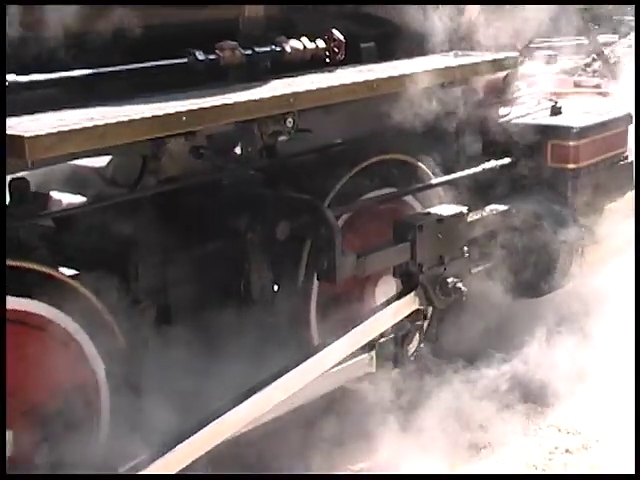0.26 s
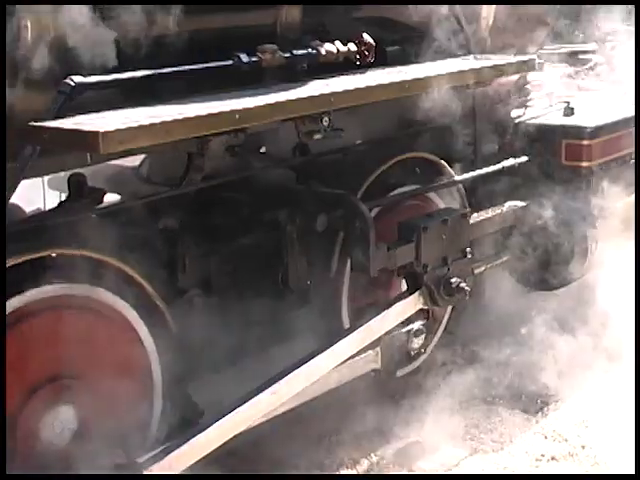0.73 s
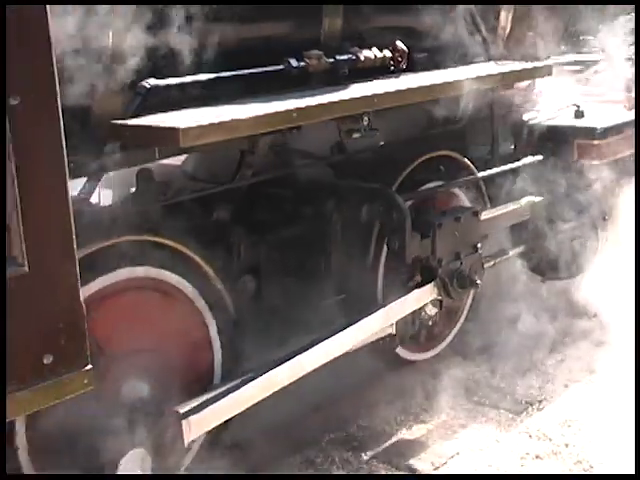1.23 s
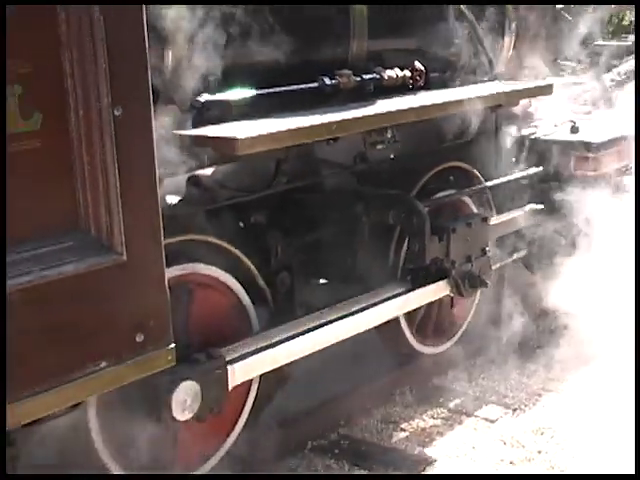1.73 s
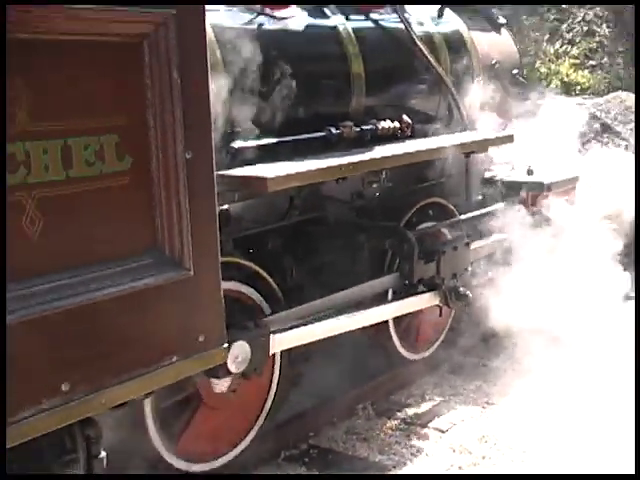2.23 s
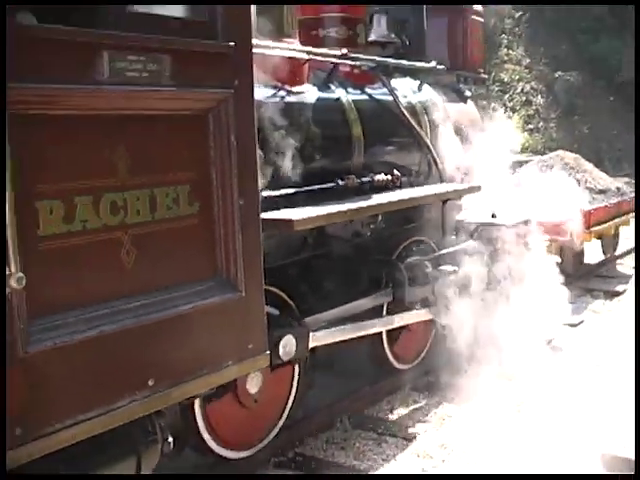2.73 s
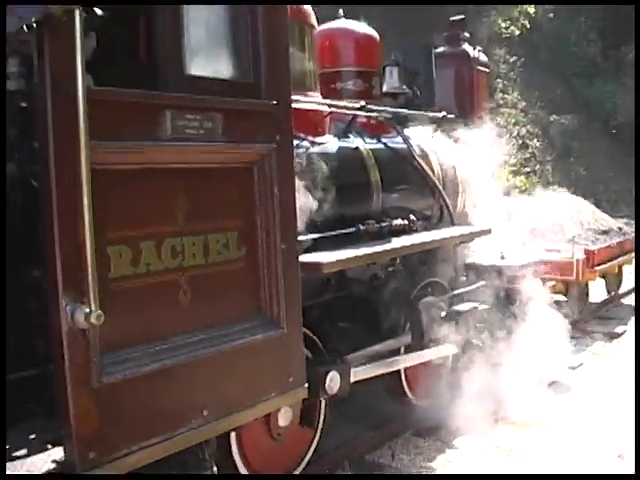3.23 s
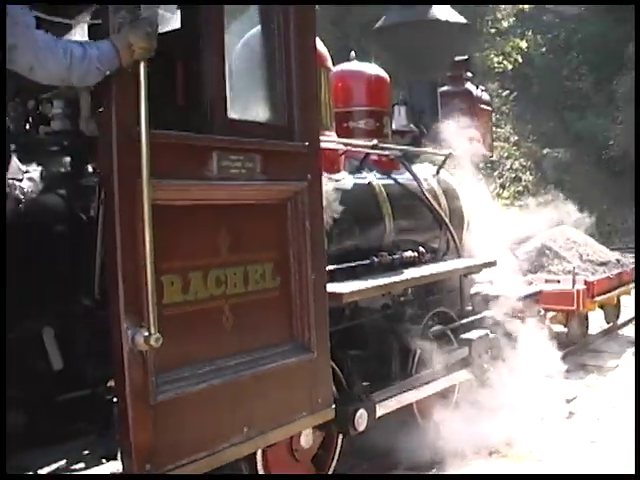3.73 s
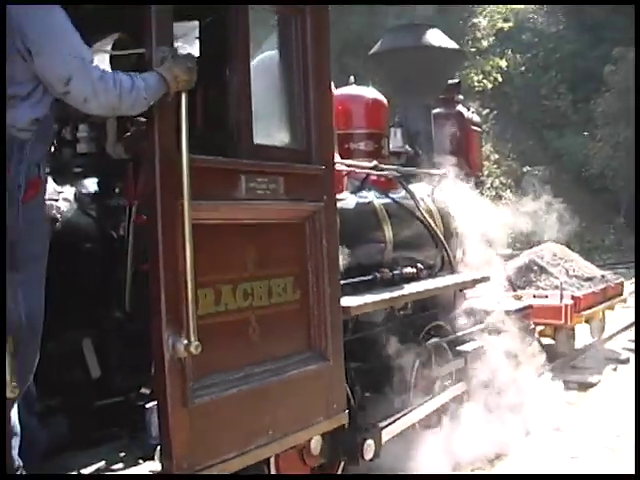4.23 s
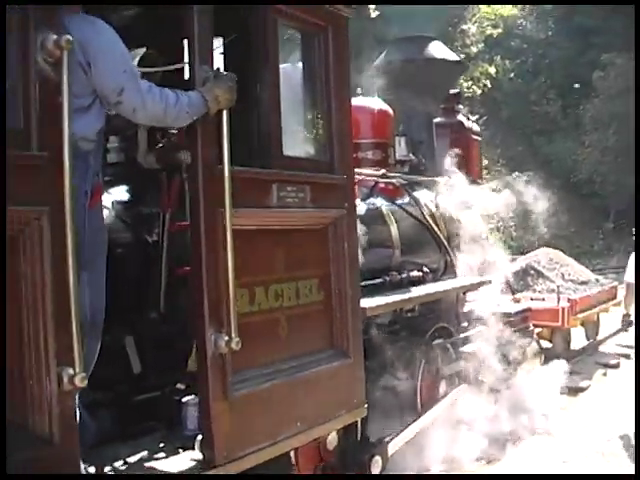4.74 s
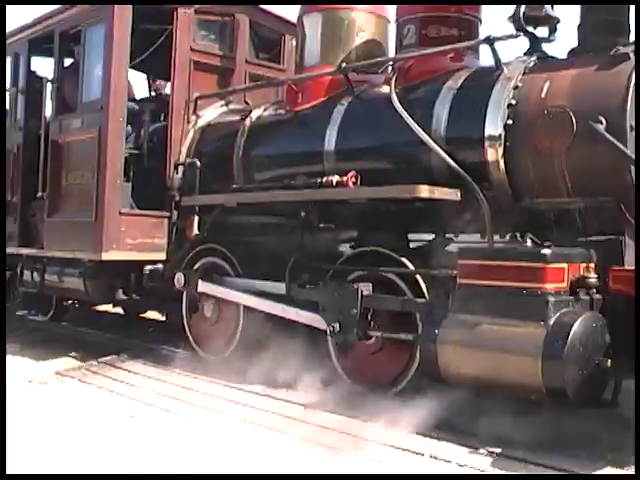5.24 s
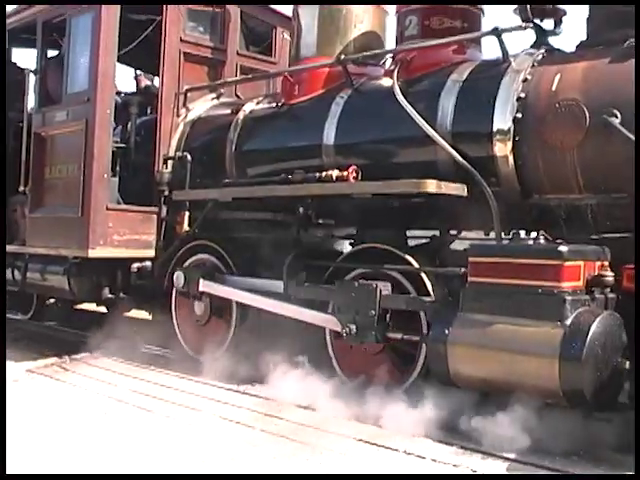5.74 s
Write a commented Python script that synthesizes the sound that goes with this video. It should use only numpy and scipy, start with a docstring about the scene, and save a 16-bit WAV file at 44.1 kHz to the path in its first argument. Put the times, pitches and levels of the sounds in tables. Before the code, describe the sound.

A small steam locomotive hisses loudly up close, chuffing in a limping beat over a low fire rumble, then suddenly sounds softer and farther away.

```python
"""Small steam locomotive, close by the cab, then farther off

A small steam locomotive rolls along, heard from beside its cab. Steam, made of coloured noise, hisses from the
open cylinder cocks and surges at every piston stroke. The chimney answers with chuffs in a limping long-short
beat: bursts of noise through its resonances. The fire rumbles below, with a hollow note that once swells to a tone.
Near the end the sound cuts to a place farther off, where a soft hiss lies between two faint chuffs.
"""
import sys
import numpy as np
from scipy import signal
from scipy.fft import rfft, irfft, next_fast_len
from scipy.io import wavfile
from scipy.ndimage import uniform_filter1d, map_coordinates

SR = 44100
rng = np.random.default_rng(int(sys.argv[2]) if len(sys.argv) > 2 else 0)


def wav_record(signal):
    """Record a signal, one row per channel, as 16-bit PCM in the file named by sys.argv[1]."""
    frames = np.transpose(np.atleast_2d(signal))
    bounded = np.clip(frames, -1, 1)
    # unit amplitude maps onto the largest positive 16-bit level
    quanta = np.round(bounded * 32767).astype(np.int16)
    wavfile.write(sys.argv[1], SR, quanta)


N = 263702

# piston strokes beside the cab, from the two cylinder ends in turn: start_s, chuff_db, gush_db (from the cocks)
STROKES = [(0.376, -22.5, -30), (0.787, -22.5, -25.5), (1.305, -24, -27.5), (1.725, -23, -31),
           (2.239, -23.5, -24.5), (2.655, -23.5, -28.5), (3.173, -23.5, -22), (3.589, -25.5, -22.5),
           (4.114, -25, -22), (4.529, -24.5, -27), (5.048, -24.5, -31)]
# left-right likeness of the engine's sound: frequency_hz, likeness (0-1)
ENGINE_LIKENESS = [(200, .998), (330, 0.94), (550, 0.51), (750, 0.98), (1200, 0.96), (2400, 1), (6000, 1)]


def amp(db):
    """Decibels to gain."""
    return 10 ** (np.asarray(db) / 20)


def unit(x):
    """Scale to rms 1."""
    return x / np.sqrt(np.mean(x ** 2) + 1e-20)


def clock():
    """The time of every sample, in seconds."""
    return np.arange(N) / SR


def along(points, hz):
    """Read (Hz, value) points on a log frequency axis."""
    point_hz, value = np.transpose(points)
    return np.interp(np.log(hz + 1), np.log(point_hz + 1), value)


def wobble(rate):
    """A smooth random curve through rate knots a second."""
    knots = rng.standard_normal(int(N * rate / SR) + 4)
    return map_coordinates(knots, [clock() * rate])


def swell(centre, width):
    """A bell curve in time (s), 1 at its centre."""
    return np.exp(-((clock() - centre) / width) ** 2)


def filtered(x, response):
    """Multiply the spectrum of x by a response of frequency, padded against wrap-around."""
    m = next_fast_len(N + SR // 2)
    hz = np.fft.rfftfreq(m, 1 / SR)
    return irfft(rfft(x, m) * response(hz), m)[..., :N]


def broad(points):
    """The gain of a broad spectrum, as a function of frequency."""
    return lambda hz: amp(along(points, hz))


def resonant(modes):
    """The gain of steep-sided resonances that add in power."""
    def gain(hz):
        power = 0
        for centre_hz, width_hz, db in modes:
            detuning = (hz * hz - centre_hz * centre_hz) / (2 * width_hz * hz + 1e-9)
            power = power + (amp(db) / (1 + 2 * detuning ** 2)) ** 2
        return np.sqrt(power)
    return gain


def rush(colour, alike, patchy_db):
    """Turbulent stereo noise of rms 1, with eddies as patches of random gain in time and frequency."""
    z = signal.stft(rng.standard_normal((2, N)), nperseg=512)[2]
    patches = uniform_filter1d(rng.standard_normal(z.shape[1:]), size=8, axis=0)
    patches = uniform_filter1d(patches, size=12, axis=1)
    pair = signal.istft(z * amp(patchy_db * unit(patches)), nperseg=512)[1][:, :N]

    def mid_side_gain(hz):
        # more side against mid makes left and right less alike
        turn = np.arccos(np.clip(along(alike, hz), -1, 1)) / 2
        return colour(hz) * np.array([np.cos(turn), np.sin(turn)])

    mid, side = filtered(pair, mid_side_gain)
    return unit(np.array([mid + side, mid - side]))


def puff(start, length, rise, sag_db, fade):
    """A valve opens, the flow changes by -sag_db while it stays open, then dies away after it shuts (times in s)."""
    t = np.maximum(clock() - start, 0)
    opening = 1 - np.exp(-t / rise)
    shutting = np.exp(-np.maximum(t - length, 0) / fade)
    return opening * amp(-sag_db * t / length) * shutting


def beats(rows):
    """Each stroke's start, open time and levels; the two cylinder ends alternate."""
    # how long the exhaust stays open, for each cylinder end: open_s
    open_times = (0.14, .16)
    return [(s, open_times[k % 2], *levels) for k, (s, *levels) in enumerate(rows)]


def off_ironwork(x, share, count=4):
    """Wheels, frame and ground throw back weak copies, whose delays drift as the engine moves."""
    t = clock()
    delays_s = [d * (1 + .02 * wobble(.7)) for d in rng.uniform(.001, .01, count)]
    copies = sum(np.array([np.interp(t - d, t, side) for side in x]) for d in delays_s)
    return unit(x + share * copies)


def panned(x, db):
    """Lean a stereo sound to the left by db."""
    return np.array([x[0] * amp(db / 2), x[1] * amp(-db / 2)])


def cock_steam(level_db):
    """A steady jet of steam, with a bright spit as the cylinder fills and then a duller gush."""
    # spectrum of the steady jet: frequency_hz, relative_db
    jet_spectrum = [(200, -57), (450, -18.5), (700, -9.5), (1000, -6.5), (1300, -3.5), (1750, -2.5),
                    (2400, -1.5), (3200, -1), (4500, 0), (6000, -3), (8500, -5.5), (11200, -15),
                    (13500, -14.5), (15700, -21)]
    # spectrum of the bright spit: frequency_hz, relative_db
    spit_spectrum = [(900, -33), (2200, 2), (4200, 0.5), (8500, 0.5), (11500, -10), (15700, -15)]
    # spectrum of the duller gush: frequency_hz, relative_db
    gush_spectrum = [(700, -25), (1800, -4.5), (3100, 1.5), (4200, -1.5), (6000, -10), (15700, -29)]
    # left-right likeness of the jet: frequency_hz, likeness (0-1)
    jet_likeness = [(300, .8), (550, 0.34), (1000, 0.7), (1600, 0.57), (2400, 0.75), (4200, 0.83),
                    (7000, 0.67), (10000, 0.8), (12500, 0.44), (15000, .25)]
    spit_db, spit_lead_s = -4.5, .035  # over the jet, and ahead of the chuff

    spit_flow, gush_flow = 0, 0
    for s, _, gush_db in STROKES:
        spit_flow = spit_flow + puff(s - spit_lead_s, .055, rise=.022, sag_db=-2.5, fade=.021)
        gush_flow = gush_flow + amp(gush_db) * puff(s - .005, .075, rise=.02, sag_db=-1.5, fade=.045)
    jet = amp(level_db) * off_ironwork(rush(broad(jet_spectrum), jet_likeness, patchy_db=1.12), share=.11)
    spit = amp(level_db + spit_db) * spit_flow * rush(broad(spit_spectrum), jet_likeness, patchy_db=0)
    gush = gush_flow * rush(broad(gush_spectrum), ENGINE_LIKENESS, patchy_db=3)
    return jet + spit + gush


def nozzle_ring():
    """The nozzles ring faintly all along, and harder in each stroke when they face the listener."""
    # resonances of the nozzles: centre_hz, width_hz, relative_db
    nozzle_modes = [(2370, 200, 2), (2150, 170, -5), (1891, 60, -4)]
    steady_db, stroke_db = -35.5, -21
    facing_s, facing_width_s, aside_db = 2.66, 1.7, -10  # when they face the listener; the loss when aside

    facing_db = stroke_db + aside_db * (1 - swell(facing_s, facing_width_s))
    flow = sum(puff(s - .03, length, rise=.04, sag_db=6.5, fade=.036) for s, length, *_ in beats(STROKES))
    steady = amp(steady_db + 1.5 * wobble(6))
    strength = np.hypot(amp(facing_db) * flow, steady)
    return strength * amp(wobble(24.93)) * rush(resonant(nozzle_modes), ENGINE_LIKENESS, patchy_db=1.5)


def frame_hollow():
    """The hollow under the frame colours the hiss and is left behind as the engine goes."""
    # resonances under the frame: centre_hz, width_hz, relative_db
    frame_modes = [(1264, 140, 1), (1090, 60, -6), (1465, 97, -6.5), (810, 99, -11)]
    # left-right likeness of the hollow: frequency_hz, likeness (0-1)
    hollow_likeness = [(300, .8), (550, 0.34), (1000, 0.7), (1600, 0.57), (2400, 0.75), (4200, 0.83),
                       (7000, 0.67), (10000, 0.8), (12500, 0.44), (15000, .25)]
    start_db, db_per_s = -34.3, -1.84
    return amp(start_db + db_per_s * clock()) * rush(resonant(frame_modes), hollow_likeness, patchy_db=1.5)


def cocks():
    """Wet steam sputters from the cylinder cocks, loses treble behind the cab and rings in the nozzles."""
    t = clock()
    jet_db, jet_db_per_s = -21.1, -.45  # the steady jet recedes
    treble_db, shade_db_per_s = 3, -.54  # the cab comes to shade its top

    steam = cock_steam(jet_db + jet_db_per_s * t)
    treble = filtered(steam, lambda hz: hz ** 4 / (hz ** 4 + 7000 ** 4))
    tilt_db = treble_db + shade_db_per_s * t + .42 * wobble(45)
    shaded = steam + (amp(tilt_db) - 1) * treble
    # slow unsteadiness of the jet, and faster sputter as water passes with the steam
    sputter = amp(.2 * wobble(12) + .62 * wobble(70))
    ring = nozzle_ring()
    return sputter * (shaded + frame_hollow()) + ring


def fire():
    """The flame throbs in the firebox, fanned by the exhaust, with a hollow note that comes and goes."""
    # resonances of the firebox: centre_hz, width_hz, relative_db
    firebox_modes = [(50.5, 9, -.5), (61, 22, -7.5), (118.3, 30, -8), (199.7, 42, -6.5), (268, 54, -7.5)]
    # resonances of the hollow note: centre_hz, width_hz, relative_db
    note_modes = [(318, 14, 0.5), (339, 16, -5.5)]
    base_db, db_per_s = -35.5, -.6
    draught_db, draught_lag_s = 3, .03  # each chuff draws the fire up; it sinks back in the long gap
    note_db, note_wander_db = -38.5, 1.5
    howl_s, howl_width_s, howl_hz, howl_db = .23, .1, 318, -32  # once the note swells to a clear tone

    draught = sum(puff(s + draught_lag_s, .25, rise=.04, sag_db=.5, fade=.12) for s, *_ in STROKES)
    rumble_db = base_db + db_per_s * clock() + draught_db * draught + .7 * wobble(16)
    rumble = amp(rumble_db) * rush(resonant(firebox_modes), ENGINE_LIKENESS, patchy_db=1)
    wander_db = note_wander_db * wobble(4.02)
    note = amp(note_db + wander_db) * rush(resonant(note_modes), ENGINE_LIKENESS, patchy_db=.5)
    pitch_hz = howl_hz * (1 + .0085 * wobble(25))
    tone = unit(np.sin(2 * np.pi * np.cumsum(pitch_hz) / SR))
    return rumble + note + amp(howl_db) * swell(howl_s, howl_width_s) * tone


def chuffs(rows):
    """Each exhaust blast roars up the chimney, rings its upper modes and booms in its pipe."""
    # spectrum of the blast: frequency_hz, relative_db
    blast_spectrum = [(150, -21), (400, -4), (540, -4.5), (700, -3.5), (930, -4.5), (1100, -1.5),
                      (1700, -4.5), (2500, -2.5), (3700, -4.5), (5000, -12), (10000, -22.5)]
    # low resonances of the chimney pipe: centre_hz, width_hz, relative_db
    pipe_modes = [(141.5, 55, 2.5), (215, 74, -1), (318, 75, -5)]
    # upper resonances of the chimney: centre_hz, width_hz, relative_db
    upper_modes = [(688, 50, 2.5), (784, 63, -5), (1070, 40, 0), (1260, 100, -6.5), (1400, 90, -5),
                   (1880, 68, -4)]
    boom_db, boom_db_per_s = -3, -.5  # the boom over the chuff, fading as the engine draws away

    flow, push = 0, 0
    for s, length, chuff_db, *_ in beats(rows):
        flow = flow + amp(chuff_db) * puff(s, length, rise=.0089, sag_db=3, fade=.044)
        push_db = chuff_db + boom_db + boom_db_per_s * s
        push = push + amp(push_db) * puff(s, length, rise=.015, sag_db=5, fade=.077)
    roar = rush(broad(blast_spectrum), ENGINE_LIKENESS, patchy_db=1.5)
    roar = roar + amp(-7) * rush(resonant(upper_modes), ENGINE_LIKENESS, patchy_db=1)
    boom = push * rush(resonant(pipe_modes), ENGINE_LIKENESS, patchy_db=1.5)
    rasp = unit(amp(.64 * wobble(75) + 1.6 * wobble(420)))  # the blast tears into eddies
    return rasp * (flow * off_ironwork(roar, share=.25) + boom)


def far_engine():
    """The engine from farther off: a thinner hiss, a faint rumble and soft chuffs."""
    # chuffs heard at a distance: start_s, chuff_db
    far_strokes = [(5.14, -39.5), (5.92, -42)]
    # spectrum of the distant hiss: frequency_hz, relative_db
    far_hiss_spectrum = [(300, -28), (600, -20), (900, -14.5), (1300, -8), (1700, -11), (2100, -3.5),
                         (2800, -5.5), (4400, -1), (7500, -5), (9700, -5.5), (11200, -15.5), (14000, -16),
                         (15700, -21)]
    # spectrum of the distant rumble: frequency_hz, relative_db
    far_rumble_spectrum = [(20, -26), (55, -6), (100, 2), (140, -8), (200, -1), (270, -5), (400, -14),
                           (700, -19.5)]
    # left-right likeness at a distance: frequency_hz, likeness (0-1)
    far_likeness = [(220, .995), (550, 0.75), (1100, 0.93), (4000, 0.96), (10000, .9), (12000, .6),
                    (15000, .5)]

    hiss = off_ironwork(rush(broad(far_hiss_spectrum), far_likeness, patchy_db=0), share=.1)
    hiss = amp(-35 + .31 * wobble(21)) * hiss
    rumble = amp(-48.5) * rush(broad(far_rumble_spectrum), far_likeness, patchy_db=.5)
    return hiss + rumble + chuffs(far_strokes)


def scene():
    """The place beside the cab gives way to the far one at the cut."""
    cut_s, cut_length_s = 5.207, .003
    pan_db, pan_settle_s = 2.5, 1.8  # the hiss drifts from the left to the middle
    far = np.clip((clock() - cut_s) / cut_length_s + .5, 0, 1)
    hiss = panned(cocks(), pan_db * np.exp(-clock() / pan_settle_s))
    near = hiss + chuffs(STROKES) + fire()
    return (1 - far) * near + far * panned(far_engine(), -.5)


def microphone(hz, turn_hz, width_hz):
    """The left side turns a full cycle in phase around turn_hz; the left-right balance varies with frequency."""
    # balance of the two sides: frequency_hz, left_over_right_db
    side_balance = [(250, 1.4), (450, 2.5), (820, 4), (1150, 2.5), (1650, 0.5), (2000, -0.3), (4000, 0),
                    (5000, -1.5), (10000, -1), (12500, -3), (15500, -2)]
    pole = turn_hz ** 2 - hz ** 2 + 1j * hz * width_hz
    lean = amp(along(side_balance, hz) / 2)
    return np.array([lean * np.conj(pole) / pole, 1 / lean])


def record(dry):
    """A stereo microphone, its bass roll-off and its band limit."""
    top_hz = 15750

    def response(hz):
        low_cut = hz ** 6 / (hz ** 6 + 30 ** 6)
        return microphone(hz, turn_hz=513, width_hz=283) * low_cut * (hz < top_hz)

    return filtered(dry, response)


dry = scene()
out = record(dry)
wav_record(out)
```